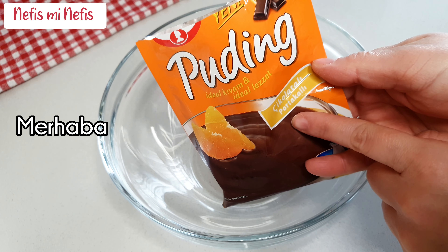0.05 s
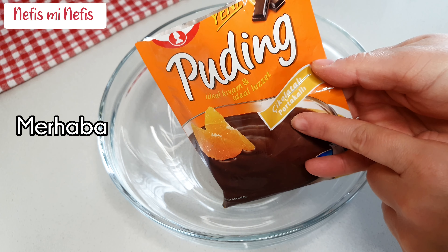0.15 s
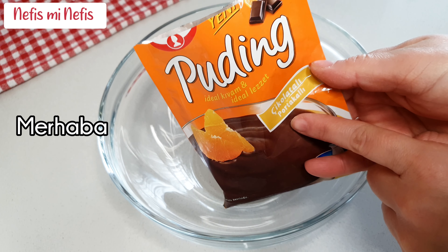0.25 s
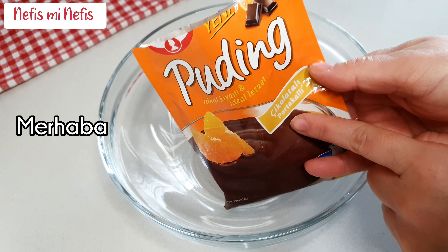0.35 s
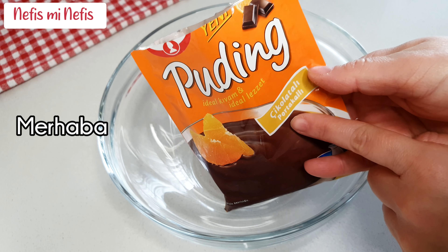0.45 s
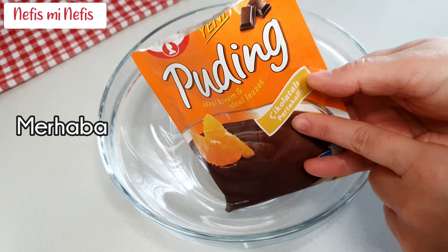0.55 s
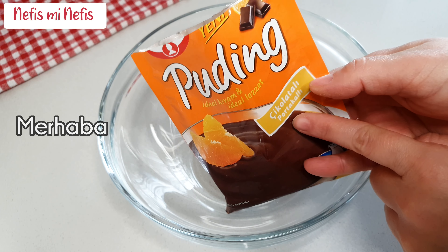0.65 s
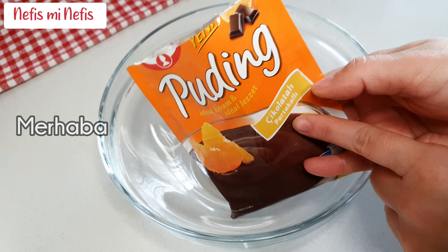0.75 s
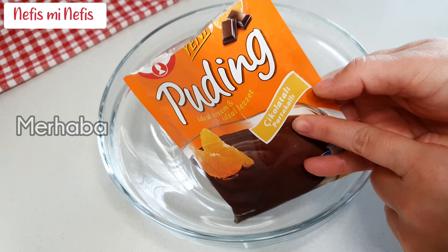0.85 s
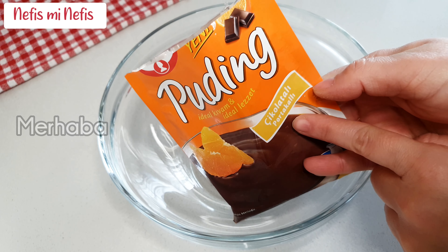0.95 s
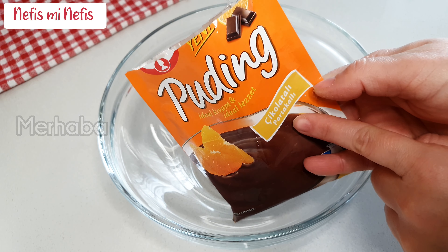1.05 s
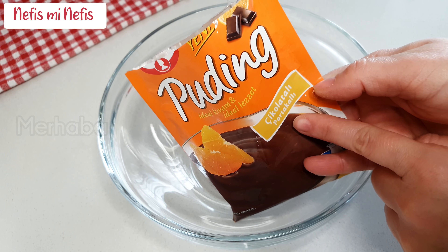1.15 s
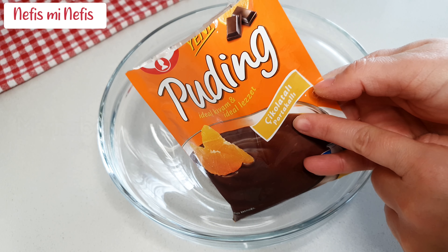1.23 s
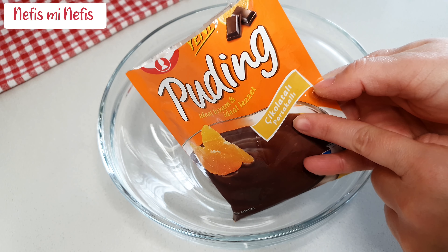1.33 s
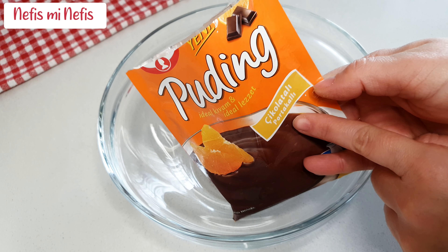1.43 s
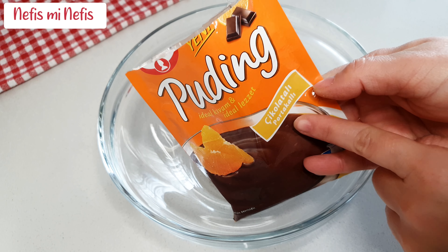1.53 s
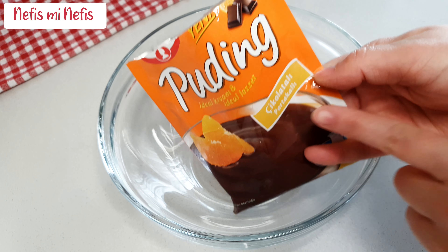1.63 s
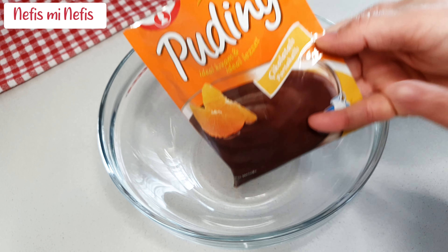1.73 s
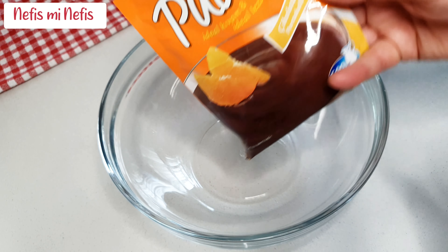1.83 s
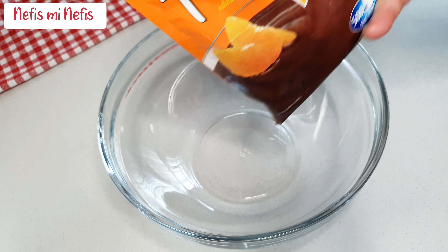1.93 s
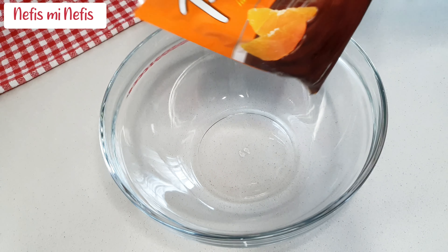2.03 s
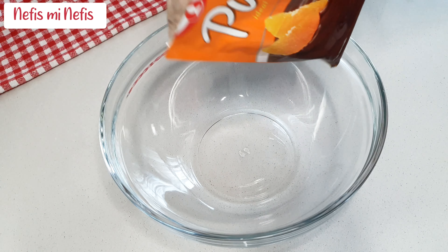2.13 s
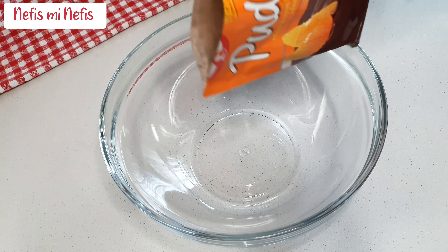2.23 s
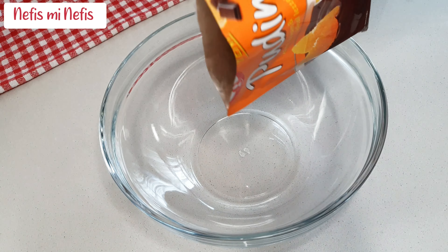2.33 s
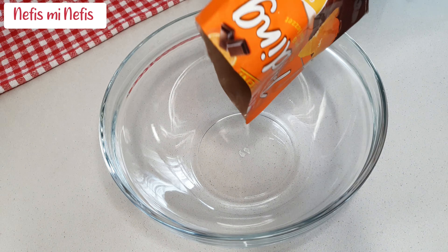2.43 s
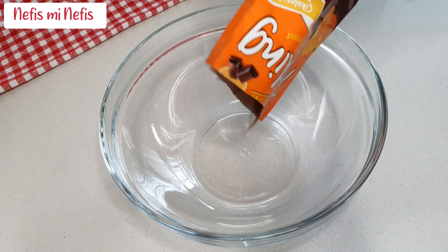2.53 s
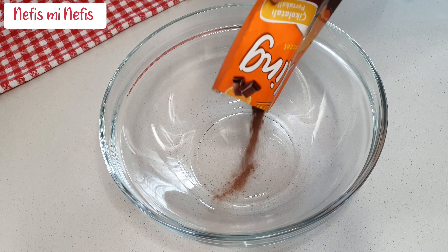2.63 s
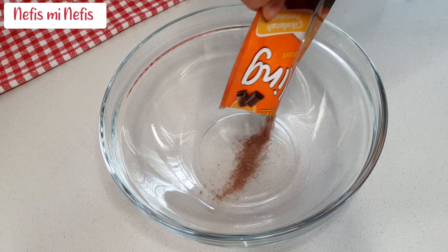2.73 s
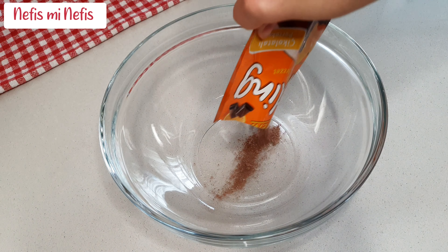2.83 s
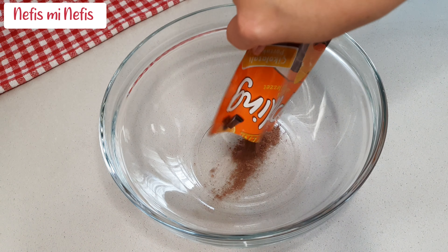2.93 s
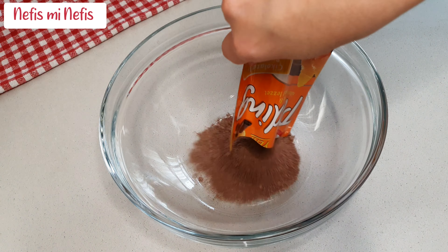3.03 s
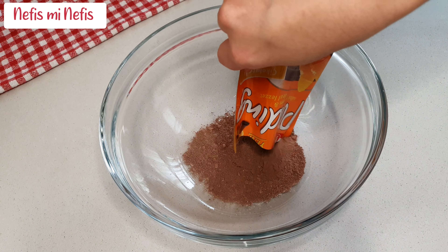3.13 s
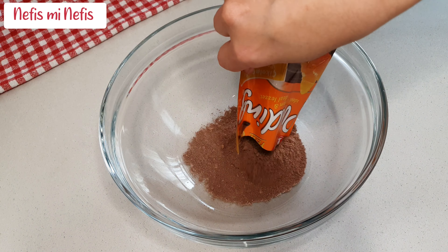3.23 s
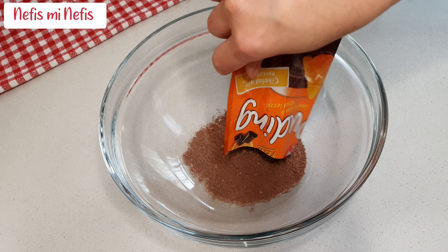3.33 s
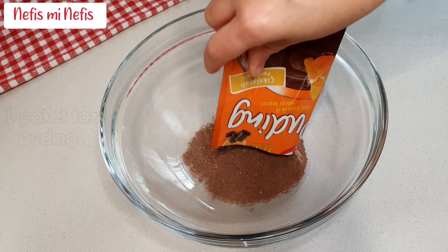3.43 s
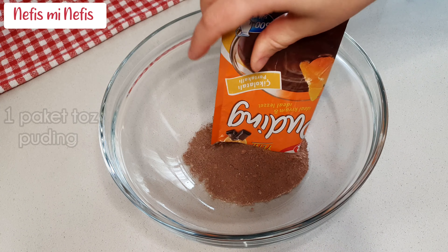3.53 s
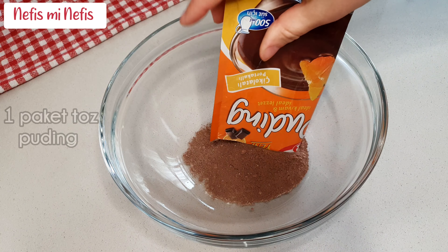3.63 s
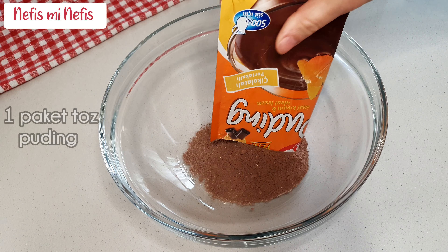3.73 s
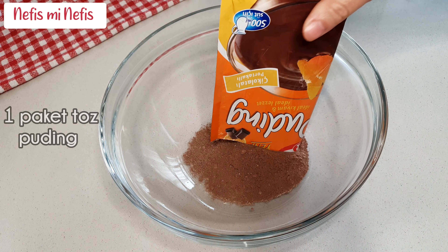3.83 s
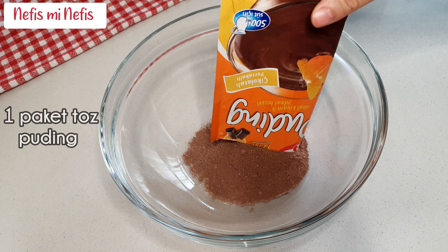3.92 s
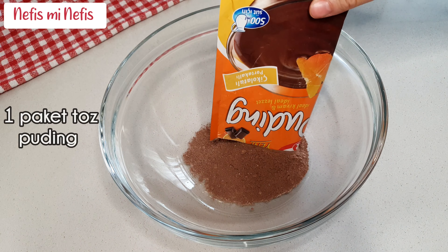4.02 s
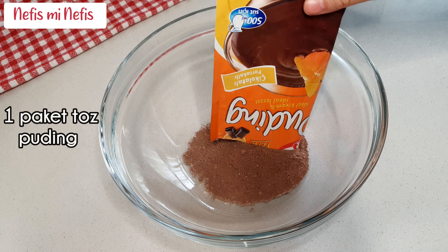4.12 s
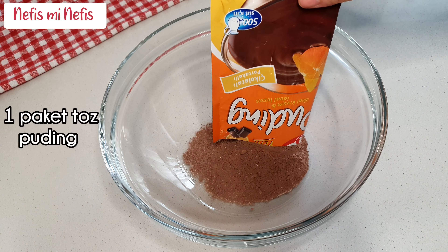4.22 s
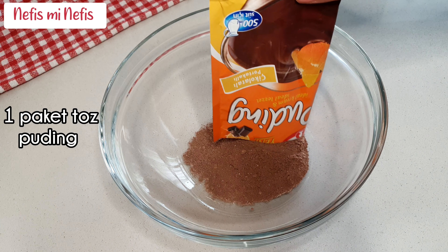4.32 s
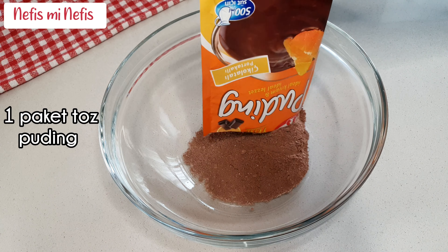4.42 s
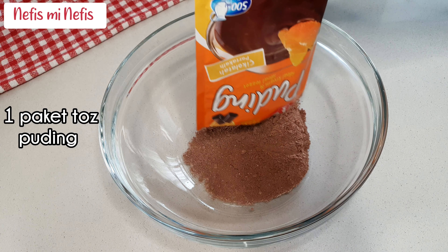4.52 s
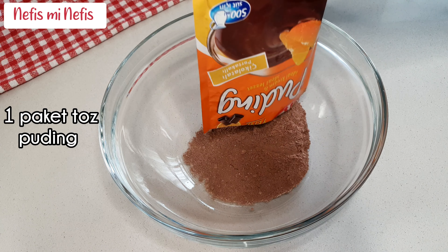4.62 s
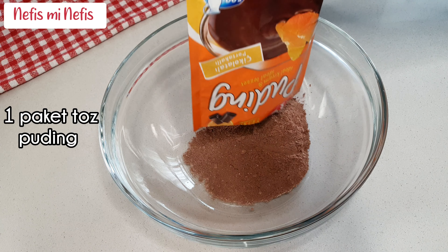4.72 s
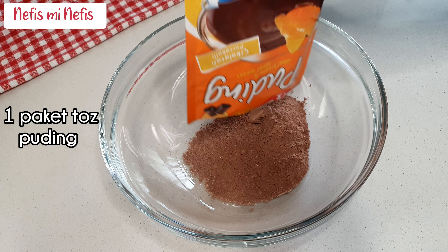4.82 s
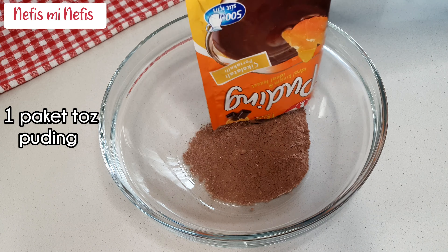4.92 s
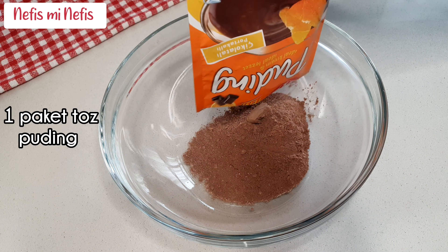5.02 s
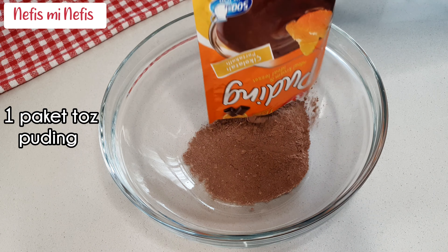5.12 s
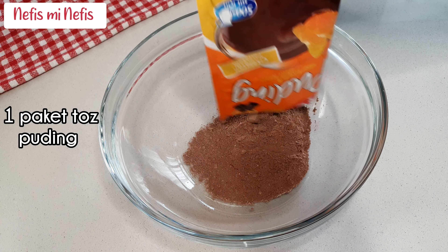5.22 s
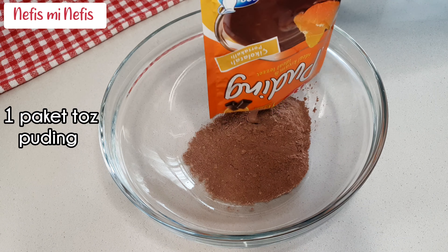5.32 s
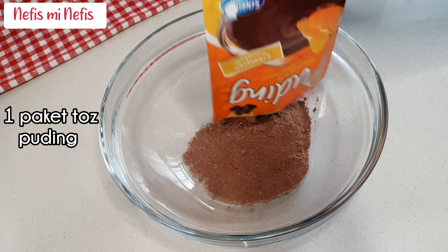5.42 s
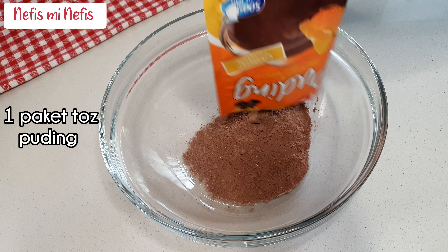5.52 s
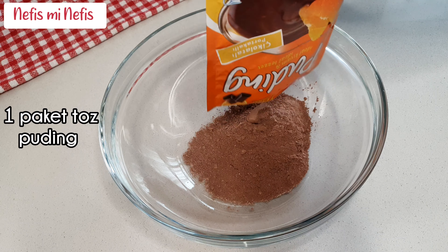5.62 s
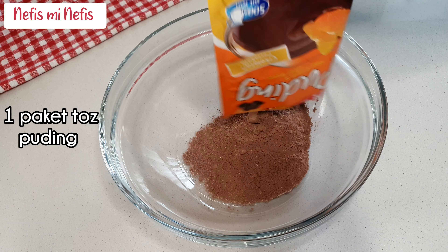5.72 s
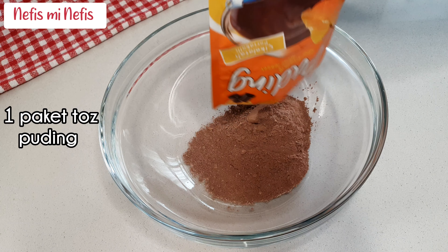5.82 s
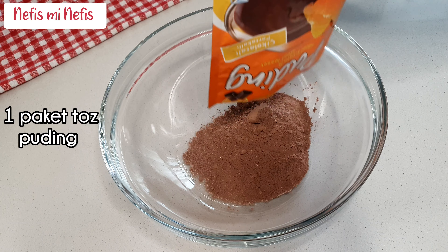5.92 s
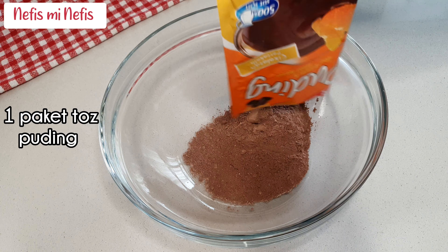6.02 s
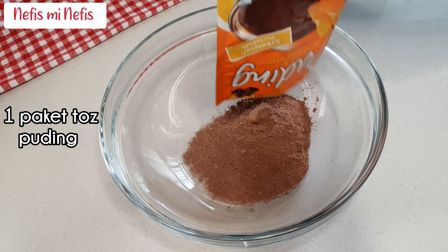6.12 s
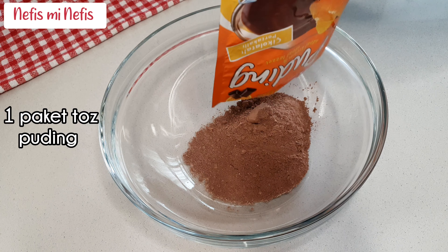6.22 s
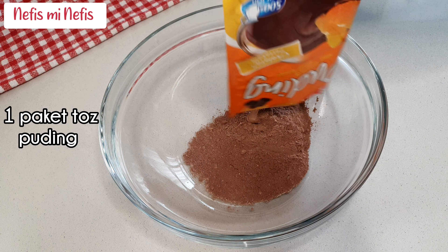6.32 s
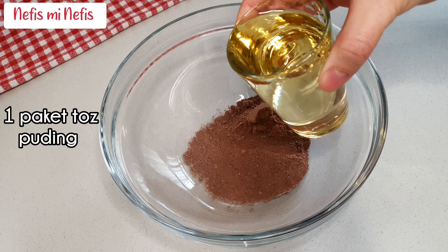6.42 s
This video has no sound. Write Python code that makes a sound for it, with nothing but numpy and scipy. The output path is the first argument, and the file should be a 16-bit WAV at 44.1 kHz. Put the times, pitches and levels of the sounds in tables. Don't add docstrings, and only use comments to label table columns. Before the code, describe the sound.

Close stereo pair in a small, short-echoed kitchen, with a quiet low hum throughout. From 0 to 1.8 s a full plastic packet is merely held: isolated soft, dull ticks near 0.4, 1.0 and 1.7 s, a slight finger rub, and barely audible wavering tones from beyond the wall. From 1.9 s the film is turned, and by 2.15 to 2.6 s crisp creases crackle in a dense flurry. Tiny gritty chirps at 2.7 s lead to a strong snap at 2.8 s. Powder hisses out in grainy swells until about 3.8 s, over low rustling, with loud snaps clustered around 3.4 to 3.5 s. A short lull, then gripping crackles and the sharpest, loudest crack at 4.2 s, thinning afterward. From 5 s, hollow papery slaps come about every 0.15 s, with light flaps and dust puffs between them, cut off abruptly at 6.4 s.

```python
import sys
import numpy as np
from scipy import signal
from scipy.io import wavfile
from scipy.ndimage import uniform_filter1d, minimum_filter1d

SR = 44100
rng = np.random.default_rng(int(sys.argv[2]) if len(sys.argv) > 2 else 0)


def to_wav(s):
    ch = np.atleast_2d(s).T
    pcm = np.round(np.clip(ch, -1, 1) * 32767)
    wavfile.write(sys.argv[1], SR, pcm.astype(np.int16))


def boost(x):
    u = np.asarray(x, float) / 20
    return 10 ** u


N = 284886
SECONDS = np.arange(N) / SR

# start in seconds, peak level in dB, ring in Hz, bright crack in dB, hollow body in dB.
HELD_SNAPS = [(0.002, -54.5, 1760, -20, -0.5), (0.355, -72.5, 1650, -14, 12.5),
              (0.391, -35.5, 2430, -39, -16.5), (0.514, -62.5, 1290, -25, 4.5),
              (0.694, -49, 1520, -28, -12), (0.718, -58.5, 880, -32, 5.5), (0.842, -60.5, 1500, -28, 1),
              (0.967, -40, 3030, -25, -6.5), (1.589, -60, 1390, -3, 1.5), (1.711, -36.5, 2740, -33, -19)]
TURNED_SNAPS = [(1.883, -63, 6000, -13, -28), (1.908, -55, 4800, -20, -25), (1.976, -59, 2500, -24, -25),
                (2.021, -48.5, 3800, -26, -8), (2.093, -47.5, 1700, -24, -6), (2.119, -43.5, 1770, -26, -8),
                (2.154, -28.5, 4840, 1, -16), (2.16, -22.5, 6500, -12, -14), (2.172, -45, 2420, -20, -12),
                (2.26, -40.5, 4050, -18, -34), (2.296, -30.5, 3820, -7, -34), (2.321, -32, 2220, -33, -6.5),
                (2.333, -32, 2290, -29, -11), (2.342, -27, 2580, -30, -16), (2.352, -30, 3300, -25, -14),
                (2.36, -27.5, 2480, -30, -15), (2.369, -24.5, 3070, -30, -7.5),
                (2.378, -26, 3600, -24, -20), (2.396, -33.5, 4000, -22, -25), (2.416, -29, 3570, -22, -30),
                (2.444, -24, 2230, -19, -17), (2.456, -29, 3400, -22, -23), (2.462, -34.5, 1500, -25, -6),
                (2.479, -21.5, 3680, -24, -23), (2.488, -20, 2800, -25, -38), (2.514, -45, 1110, -25, -12),
                (2.536, -39, 1300, -8, -10), (2.554, -26, 3530, -7, -16), (2.562, -29, 1500, -15, -25),
                (2.568, -57, 5860, -14, -20), (2.575, -27.5, 1290, 7, -11.5), (2.64, -21, 6600, -6, -43),
                (2.701, -56, 3910, -2, -19), (2.7305, -27.5, 2140, -38, -10.5)]
SQUEEZED_SNAPS = [(2.792, -12.5, 4360, -22, -19), (2.811, -30, 1640, -23, -6),
                  (2.832, -26.5, 1860, -16, -7), (2.87, -28.5, 2080, -18, -15),
                  (2.951, -30.5, 3140, -8, -5), (2.977, -38, 3000, -10, -22),
                  (2.983, -35, 1185, -22.5, -4.5), (2.994, -25, 2500, -2.5, -9),
                  (3.015, -28, 1200, -12.5, 1.5), (3.023, -28.5, 2150, 8, -13.5),
                  (3.034, -35.5, 654, -20, -7.5), (3.113, -32, 1290, -18, -12), (3.157, -36, 1400, -23, -6),
                  (3.189, -39, 1500, -17, -8.5), (3.221, -41, 1050, -19, -17), (3.041, -33, 1710, -8, -7),
                  (3.134, -22, 1720, -35, -25), (3.204, -23.5, 1630, -23.5, -8.5),
                  (3.304, -42, 1670, -5.5, -25.5), (3.34, -24.5, 2780, -5, -13),
                  (3.363, -29.5, 660, -23, 3), (3.393, -7.5, 4230, -30, -34.5),
                  (3.42, -26.5, 760, -22.5, -15), (3.414, -22.5, 1500, -21.5, 2),
                  (3.448, -14.5, 2320, -29, -12.5), (3.472, -13.5, 2520, -18, -10),
                  (3.481, -18.5, 1450, -28.5, -14), (3.497, -14, 3550, -12, -13.5),
                  (3.547, -22, 1170, -20, -30), (3.556, -21, 3300, -20, -14), (3.564, -49, 1210, -16, -19),
                  (3.647, -35, 1140, -24, -12), (3.669, -28.5, 1770, -4, -14),
                  (3.674, -20.5, 3380, -20, -9), (3.713, -31.5, 1280, -20, -15),
                  (3.755, -42.5, 656, -16, 4), (3.771, -32.5, 5330, -15, -26.5),
                  (3.791, -34, 5500, -29, -31), (3.811, -37.5, 6050, -10, -29)]
GRIPPED_SNAPS = [(4.082, -51, 1700, -37.5, -7.5), (4.091, -25.5, 2606, -37, -16),
                 (4.096, -27.5, 900, -42, -12), (4.1115, -11.5, 3260, -28, -6),
                 (4.141, -28.5, 1000, -23, 0.5), (4.165, -28.5, 3030, -22, -4),
                 (4.185, -14, 3670, -13, -20.5), (4.191, -20, 2600, -28, -11), (4.207, -30, 1580, -25, -3),
                 (4.243, -20, 2760, -24, -30), (4.247, -27.5, 720, -30, -23), (4.317, -40, 1190, -25, 4),
                 (4.322, -22, 2310, -8.5, -7.5), (4.345, -42.5, 1300, -25, -4),
                 (4.46, -20, 2840, -10.5, -37), (4.544, -45, 1300, -17, 3), (4.478, -32, 1560, -20, -6.5),
                 (4.632, -40.5, 1710, -41.5, -28), (4.671, -41.5, 3350, -31, -4.5),
                 (4.846, -47, 6300, -22, -27), (4.863, -53.5, 3160, -33, -25),
                 (4.945, -63.5, 1900, -29.5, 15), (5.268, -39.5, 2100, -29, 4), (5.333, -51.5, 1810, 10, 7)]
SEAM_CRACKS = [
    (4.2145, -9.5, 2460, -5, -24),
    (4.2151, 3, 5580, -4.5, -33.5),
    (4.2161, -9.5, 6200, -12, -39.5),
]
SHAKE_SLAPS = [(4.968, -18, 2750, -15, -4), (5.105, -12.5, 2820, -44, -6), (5.244, -25.5, 2310, -53, 1),
               (5.407, -24.5, 3620, -12, -4), (5.561, -21.5, 3040, -7.5, -5), (5.717, -20, 2850, -8.5, -6),
               (5.885, -19, 2940, -13.5, -6), (6.028, -17.5, 3060, -11.5, -9), (6.18, -21, 2800, -18, -6),
               (6.326, -24, 3230, -8, -7.5)]
SETTLING_SNAPS = [(4.982, -33.5, 653, -30, 4), (5.069, -63, 586, -20, -13), (5.118, -34.5, 1910, -32, 10.5),
                  (5.166, -51, 1230, -32, 10), (5.428, -41, 576, -39, -14), (5.578, -40, 1810, -25, -7),
                  (5.59, -43, 2500, -25, -17), (5.727, -41.5, 2300, -29, -12), (5.742, -41, 2000, -25, -4),
                  (5.9, -40, 2200, -27, -6), (6.042, -38, 600, -30, -10), (6.062, -33.5, 3280, -28, -27),
                  (6.116, -44, 3500, -31, -16), (6.197, -49, 750, -29, -21), (6.341, -40, 664, -24, 1),
                  (6.358, -52, 3320, -25, -10), (6.368, -48, 2500, -18, -9)]
# start in seconds, peak level in dB.
UPSTROKE_FLAPS = [(5.48, -42.5), (5.635, -39), (5.798, -37), (5.952, -38), (6.11, -34.5), (6.254, -42),
                  (6.399, -38.5)]
SIDE_SHARES = [0.59, 4.1, 1.5, 0.77, 0.17]
LINGER_DB = [-1.5, 4, 8, -3.5, 5]
# pitch in Hz, width in Hz, level in dB.
HOLLOW_MODES = [(625, 80, -6), (760, 80, -6), (1160, 95, 2.5), (1800, 300, -9), (2660, 500, -12)]
# time in seconds, pitch ratio.
HOLLOW_SIZE = [(0, 1), (3.9, .98), (4.1, .955), (4.9, 1), (5.1, 1.03), (5.25, .97), (5.4, .98),
               (5.56, 1.04), (6.46, 1.045)]
# peak in seconds, hiss in dB, crackle in dB, rise in seconds, fall in seconds.
PACKET_MOVES = [(.70, -76, -59, 0.039, 0.033), (.834, -83, -75, 0.34, 0.23), (.968, -95, -72, 0.047, 0.033),
                (2.1, -72.5, -64, 0.52, 0.29), (1.59, -74, -85, 0.021, 0.051), (3.899, -82, -64, .1, 0.17),
                (4.075, -91, -51.5, 0.038, .03), (4.118, -59, -70, 0.016, 0.064),
                (4.222, -43.5, -63, 0.022, 0.097), (4.27, -76.5, -54.5, 0.051, 0.64),
                (4.43, -55, -57.5, 0.2, 0.043), (4.57, -62, -73, 0.11, 0.066),
                (4.682, -63, -80.5, 0.06, 0.085), (4.86, -62, -72.5, 0.028, 0.09),
                (5.07, -61, -73, 0.031, 0.04), (5.3, -58.5, -44, 0.1, 0.035),
                (2.157, -52.5, -47, 0.013, 0.099), (2.33, -50, -58, 0.057, 0.69),
                 (2.49, -42.5, -43.5, 0.19, 0.041), (2.579, -38, -52, 0.12, 0.098),
                 (2.719, -49, -75, 0.17, 0.12), (2.8, -58, -36.5, 0.015, 0.25),
                 (2.9, -45.5, -53.5, 0.071, 0.08), (3.02, -35, -51, 0.12, 0.082),
                 (3.191, -36.5, -52, 0.17, 0.11), (3.39, -54, -34.5, 0.05, 0.24),
                 (3.541, -36.5, -36.5, 0.67, 0.11), (3.67, -42, -53, 0.11, 0.16),
                 (3.8, -52, -72, 0.24, 0.09)]
# peak in seconds, low rustle in dB, rise in seconds, fall in seconds.
WEIGHT_SHIFTS = [(0.001, -66.5, 0.011, 0.15), (.39, -72, 0.0091, 0.21), (.73, -74.5, 0.066, 0.58),
                 (.968, -73, .01, 0.17), (2.3, -67.5, 0.03, 0.33), (2.8, -54.5, 0.0099, 0.23),
                 (3.02, -46.5, 0.06, 0.067), (3.19, -57, 0.44, 0.11), (3.48, -52.5, .16, 0.38),
                 (3.7, -73.5, 0.34, 0.83), (4.118, -56, 0.045, 0.34), (4.29, -66.5, .16, 0.82),
                 (4.52, -60, 0.18, 0.048), (4.628, -59, 0.06, 0.13)]
# pitch in Hz, level in dB per Hz.
POWDER_COLOUR = [(350, -36), (600, -36), (869, -52), (1180, -9), (1450, -7.5), (2830, -2.5), (3830, -2),
                 (4160, -1), (11800, -6.5), (16000, -7)]
# start in seconds, level in dB, favoured pitch in Hz.
SQUEAK_GRAINS = [(2.679, -53, 11200), (2.703, -45, 4000), (2.705, -48, 15000), (2.707, -50, 10000),
                 (2.717, -45, 4500), (2.718, -47, 15000), (2.7185, -48, 8500), (2.729, -47, 12800)]
# pitch in Hz, level in dB, decay by 60 dB in seconds.
FILM_MODES = [(3930, 3, .07), (7080, -9, .1), (8500, -6, .12), (9440, -7, .08), (11280, -5, .11),
              (12750, -9, .11), (15030, -5, .1)]
# start in seconds, end in seconds, low edge in Hz, high edge in Hz, level in dB.
RUBS = [
    (.68, .91, 5300, 7200, -76),
    (1.84, 2.2, 3500, 11500, -70),
]
# pitch in Hz, likeness of left and right [-1 to 1].
SIDE_LIKENESS = [(60, 1), (180, 0.75), (550, 0.45), (1650, 0.031), (4970, 0.022), (15000, 0.01)]
# pitch in Hz, decay by 60 dB in seconds.
KITCHEN_T60 = [(200, 0.12), (1000, 0.19), (4000, 0.22), (12000, 0.1)]
# pitch in Hz, level in dB per Hz.
HUM_COLOUR = [(12, -39.5), (30, -4), (49, -12), (83, 5), (96, -16), (113, -16.5), (204, -14), (337, -34.5),
              (377, -19.5), (485, -47.5), (1260, -57.5), (1370, -42), (3000, -47.5), (16000, -88.5)]
# time in seconds, level in dB.
HUM_LOUDNESS = [(0.0, -80), (0.12, -62), (1.58, -55.5), (1.6, -58), (2.45, -55.5), (3.38, -54), (3.44, -47),
                (3.52, -55.5), (4.05, -63.5), (4.08, -55.5), (4.95, -60.5), (4.97, -56), (6.3, -58.5),
                (6.46, -62)]
# start in seconds, end in seconds, pitch in Hz, level in dB.
DRONES = [
    (0.383, 0.55, 384, -71),
    (0.638, 0.836, 410, -65.5),
    (1.715, 1.87, 337, -72),
]


def snap_bursts(count, burst_s, fray, edge, size):
    t = np.arange(size) / SR
    shares = np.array(SIDE_SHARES)
    chance = rng.standard_normal((count, 5, 3, size))
    decay = 1.12 * np.exp(-t / 0.00034) + np.exp(-t / burst_s) + fray * np.exp(-t / 0.0085)
    ragged = (chance[:, :, :1] + chance[:, :, 1:] * shares.reshape(5, 1, 1)) * decay
    ragged[:, :3, [0, 1], [0, 5]] += edge * shares[:3, None] + edge
    ragged[:, 3, :, 0] += 7
    click = np.tile(t == 0, (count, 5, 1, 1))
    return np.concatenate([ragged, click], axis=2)


def hollow(x, low_db=0, stretch=1):
    out = 0
    for k, (hz, width_hz, db) in enumerate(HOLLOW_MODES):
        gain = boost(db + low_db * (k < 2))
        out = out + (-1) ** k * gain * resonate(x, hz * stretch, width_hz)
    return out


def snaps(rows, burst_s, cycles, thump_db, after_db, low_db=0, slap_db=-5.5, ring_db=-2.0, fray=0.73, edge=3.4):
    size = 1800
    direct, after = np.zeros((2, N + 2000)), np.zeros((5, N + 2000))
    bursts = snap_bursts(len(rows), burst_s, fray, edge, size)
    slaps = band(band(band(bursts[:, 1], 650, 7600), 170, 8300), 170, 6000)
    cracks = band(band(bursts[:, 2], 4900, 20000), 4000, 13000)
    knocks = band(bursts[:, 3], 220, 5800)
    thumps = band(band(bursts[:, 4], 160, 470), 80, 480)
    lows_db = low_db + 3.5 * np.array([[0], [0], [1]])
    for k, (s, peak_db, hz, bright_db, body_db) in enumerate(rows):
        ring = band(resonate(bursts[k, 0], hz, hz / cycles), hz / 4, min(2 * hz, 15000))
        stretch = np.interp(s, *np.transpose(HOLLOW_SIZE))
        knock = hollow(knocks[k], lows_db, stretch)
        parts = np.array([ring, slaps[k], cracks[k], knock, thumps[k]])
        part_db = np.array([ring_db, slap_db, bright_db - 3.0, body_db + 0.047, body_db + thump_db])
        gains = boost(peak_db + part_db)
        at = round(s * SR)
        heard = gains / np.abs(parts[:, :2]).max(axis=(1, 2))
        direct[:, at:at + size] += np.tensordot(heard, parts[:, :2], 1)
        linger_db = after_db - 0.2133 * (peak_db + 32.5) + np.array(LINGER_DB)
        lingering = boost(linger_db) * gains / np.abs(parts[:, 2]).max(axis=1)
        after[:, at:at + size] += lingering[:, None] * parts[:, 2]
    return np.vstack([direct, after])[:, :N]


def packet_snaps():
    flat = 1.6
    hits = snaps(HELD_SNAPS, 0.00052, flat, thump_db=-7.0, after_db=0.5, low_db=12,
                 fray=0.5, edge=4.6, ring_db=-2.5)
    hits += snaps(TURNED_SNAPS, 0.00071, 4.2, thump_db=-18.0, after_db=-1.0, slap_db=-7.5, low_db=0.5)
    hits += snaps(SQUEEZED_SNAPS, 0.00091, 6.4, thump_db=-18.0, after_db=3.0, slap_db=-4.5, fray=0.4, edge=2.8)
    hits += snaps(GRIPPED_SNAPS, 0.0012, 3.2, thump_db=-26.0, after_db=0.0, slap_db=-3.0)
    hits += snaps(SEAM_CRACKS, 0.00046, 5.2, thump_db=-25.5, after_db=-5.5, slap_db=-6.0, fray=0.15, edge=3.9)
    hits += snaps(SHAKE_SLAPS, 0.00047, flat, thump_db=-16.0, after_db=0.0, slap_db=-9.0,
                  ring_db=1.0, fray=0.17, edge=3.9)
    flaps = [(s, db, 2050, -32.5, -2.5) for s, db in UPSTROKE_FLAPS]
    hits += snaps(flaps, 0.0076, flat, thump_db=-9.5, after_db=0.5, low_db=2, fray=0.3, edge=0)
    hits += snaps(SETTLING_SNAPS, 0.00069, 4.6, thump_db=-17.0, after_db=0.0, slap_db=-2.5)
    return hits


def swells(rows, rest_db):
    t = np.arange(0, N + 64, 64) / SR
    power = boost(2 * rest_db)
    for s, db, rise_s, fall_s in rows:
        away = np.where(t < s, (s - t) / max(rise_s, .004), (t - s) / max(fall_s, .004))
        power = power + boost(2 * (db - 20 * away ** 1.6))
    return np.interp(SECONDS, t, 10 * np.log10(power))


def handling():
    lag_s, rise_s = 0.029, 0.031
    puffs = [(s + lag_s, db - 39, db - 32.5, rise_s, 0.08) for s, db, *_ in SHAKE_SLAPS]
    tossed = [(s + lag_s, -56, rise_s, 0.18) for s, *_ in SHAKE_SLAPS]
    s, hiss_db, crackle_db, rises_s, falls_s = np.transpose([*PACKET_MOVES, *puffs])
    return (swells(zip(s, crackle_db, rises_s, falls_s), rest_db=-93),
            swells(zip(s, hiss_db, rises_s, falls_s), rest_db=-106),
            swells([*WEIGHT_SHIFTS, *tossed], rest_db=-85))


def crackle(level_db):
    per_s = 900
    sizes = boost(4.5 * np.minimum(rng.exponential(1, N), 3.0)) * rng.choice([-1, 1], N)
    born = rng.random(N) < per_s * boost(4 * drift(25)) / SR
    pitches, dealt = np.geomspace(700, 6500, 14), rng.integers(0, 14, N)
    pans = boost(3.9 * rng.standard_normal((14, 2, 1))) * rng.choice([-1, 1, 1], (14, 2, 1))
    rings = 0
    for k, hz in enumerate(pitches):
        ring = resonate(sizes * born * (dealt == k), hz, hz / 4)
        rings = rings + pans[k] * ring * (2500 / hz) ** .6
    knocks = rms_one(hollow(sizes * born))
    return boost(level_db - 9.5) * rms_one(band(rms_one(rings) + 0.44 * knocks, 500, 10000))


def powder(level_db):
    lumps = boost(1.1 * drift(150))
    hiss = banded_noise(POWDER_COLOUR, patchy_db=1.0, lowest=522, grit_db=2.5)
    stream = boost(level_db + 4.0) * lumps * hiss
    dull = np.interp(SECONDS, [2.08, 2.95, 3.8, 3.8], [0.9, 0, 0, 1])
    return (1 - dull) * stream + dull * band(stream, 200, 9700)


def rustle(level_db):
    noise = rng.standard_normal(N) + .5 * rng.standard_normal((2, N))
    return boost(level_db - 1.0 + 5.4 * drift(32)) * rms_one(band(noise, 26, 580))


def squeaks():
    out = 0
    s, strike_db, aim_hz = np.transpose(SQUEAK_GRAINS)
    for hz, db, t60 in FILM_MODES:
        clicks = np.zeros(N)
        off_aim_db = 16 * np.abs(np.log2(hz / aim_hz))
        clicks[(s * SR).astype(int)] = boost(strike_db + db - off_aim_db)
        out = out + resonate(clicks, hz, 2.2 / t60) * SR * t60 / 14
    return out


def thumb_rub():
    out = 0
    for start_s, end_s, low_hz, high_hz, db in RUBS:
        hiss = band(band(rng.standard_normal((2, N)), low_hz, high_hz), low_hz, high_hz)
        out = out + boost(db) * half_sine(start_s, end_s) ** .5 * rms_one(hiss)
    return out


def kitchen(x):
    t = np.arange(SR // 2) / SR
    edges = 150 * 2. ** np.arange(0, 7.1, .5)
    white = rng.standard_normal((2, 2, len(t))) + .5 * rng.standard_normal((2, 1, len(t)))
    white = white * boost(2.5 * drift(67)[:len(t)])
    onset = 1 - np.exp(-t / 0.0003)
    echoes = 0
    for k, (low, high) in enumerate(zip(edges, edges[1:])):
        dying = boost(-60 * t / at_hz(KITCHEN_T60, 1.76 * low)) * onset
        echoes = echoes + band(white[k % 2], low, high) * dying
    echoes = echoes / np.sqrt(np.sum(echoes ** 2) / 2)
    return signal.fftconvolve(x[None], echoes, axes=1)[:, :N]


def room_hum():
    tone = rms_one(resonate(rng.standard_normal(N), 85.5, 1.1))
    hum = banded_noise(HUM_COLOUR, patchy_db=-0.5, lowest=18.2) + 0.41 * tone
    level_db = np.interp(SECONDS, *np.transpose(HUM_LOUDNESS))
    return boost(level_db - 1.5) * hum


def far_drones():
    out = 0
    for start_s, end_s, hz, db in DRONES:
        tone = rms_one(resonate(rng.standard_normal(N), hz, 6.7))
        out = out + boost(db) * half_sine(start_s, end_s) * tone
    return out


def self_noise():
    return boost(-88.0) * rng.standard_normal((2, N))


def banded_noise(spectrum, patchy_db, lowest, grit_db=0):
    out, together = 0, drift(4.2)
    edges = lowest * 2 ** np.arange(0, np.log2(17000 / lowest), .5)
    grit = boost(grit_db * np.minimum(rng.exponential(1, N), 5))
    white = rng.standard_normal((2, 2, N)) * grit
    for k, (low, high) in enumerate(zip(edges, [*edges[1:], 18000])):
        mid, side = band(white[k % 2], low, high)
        hz = np.sqrt(low * high)
        alike = np.clip(at_hz(SIDE_LIKENESS, hz), -1, 1)
        gain = boost(at_hz(spectrum, hz) + patchy_db * (together + 0.15 * drift(50)))
        out = out + gain * (np.sqrt(1 + alike) * mid + np.sqrt(1 - alike) * side * [[1], [-1]])
    return rms_one(out)


def resonate(x, hz, width_hz):
    r = np.exp(-np.pi * width_hz / SR)
    feedback = [1, -2 * r * np.cos(2 * np.pi * hz / SR), r * r]
    return signal.lfilter([(1 - r * r) / 2, 0, (r * r - 1) / 2], feedback, x + 1e-18)


def band(x, low_hz, high_hz):
    return signal.sosfilt(signal.butter(2, [low_hz, high_hz], "band", fs=SR, output="sos"), x)


def drift(rate):
    r = np.exp(-80 * np.pi * rate / SR)
    slow = signal.lfilter([1], [1, -2 * r, r * r], rng.standard_normal(N // 40 + 2002))[2000:]
    return np.interp(np.arange(N) / 40, np.arange(len(slow)), rms_one(slow))


def half_sine(start_s, end_s):
    return np.sin(np.pi * np.clip((SECONDS - start_s) / (end_s - start_s), 0, 1))


def at_hz(points, hz):
    point_hz, values = np.transpose(points)
    return np.interp(np.log(hz), np.log(point_hz), values)


def rms_one(x):
    return x / np.sqrt(np.mean(x ** 2) + 1e-20)


def scene():
    crackle_db, powder_db, rustle_db = handling()
    hits = packet_snaps()
    after_sound = boost(-2.5) * sum(kitchen(part) for part in hits[2:])
    packet = hits[:2] + after_sound + crackle(crackle_db) + powder(powder_db) + rustle(rustle_db)
    packet = packet + squeaks() + thumb_rub()
    fade_s = (6.4045, 6.408)
    packet = packet * np.interp(SECONDS, fade_s, [1, .045])
    hum = room_hum() * np.interp(SECONDS, fade_s, [1, .7])
    return packet + hum + far_drones() + self_noise()


def low_pass(x):
    return signal.sosfilt(signal.butter(12, 16840, fs=SR, output="sos"), x)


def record(dry):
    top = signal.sosfilt(signal.butter(2, 8000, "high", fs=SR, output="sos"), dry)
    tilted = dry + top * [[.19], [-.19]]
    cut = signal.sosfilt(signal.cheby2(14, 45, 16050, fs=SR, output="sos"), tilted)
    peaks = -minimum_filter1d(-np.abs(cut).max(axis=0), size=129)
    mix = cut / np.maximum(1, uniform_filter1d(peaks, size=65) / .8)
    return low_pass(mix)


dry = scene()
out = record(dry)
to_wav(out)
```